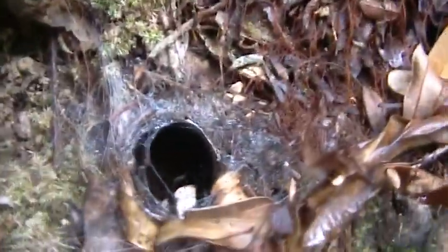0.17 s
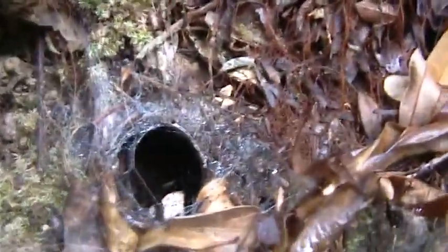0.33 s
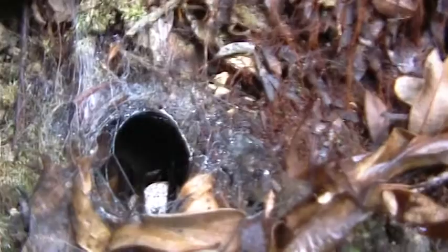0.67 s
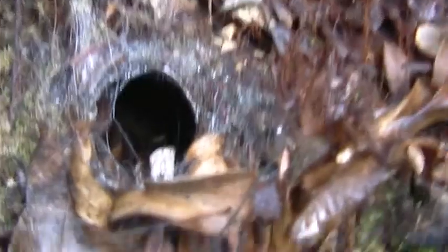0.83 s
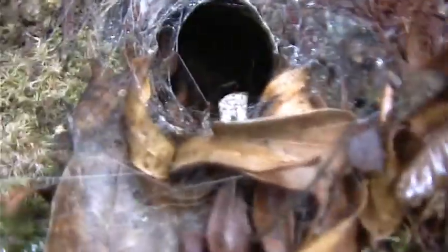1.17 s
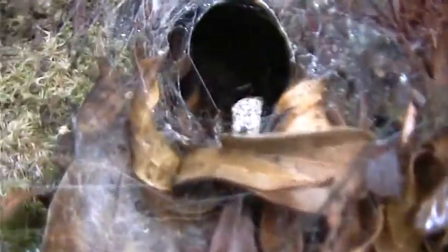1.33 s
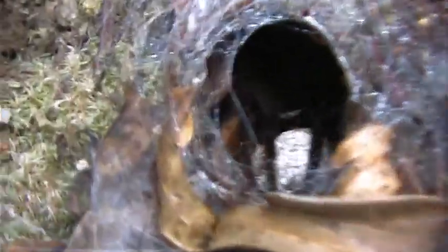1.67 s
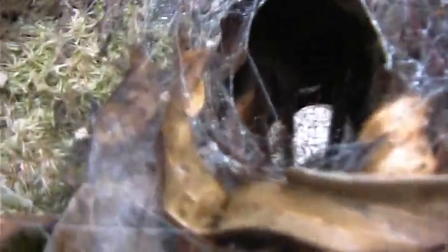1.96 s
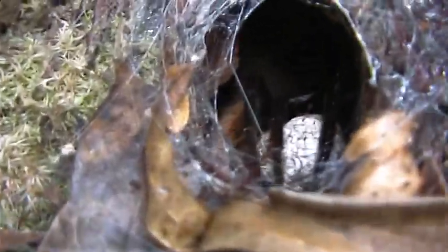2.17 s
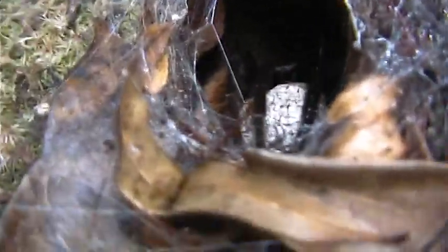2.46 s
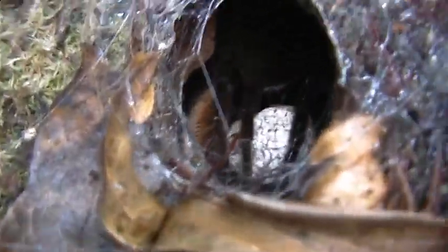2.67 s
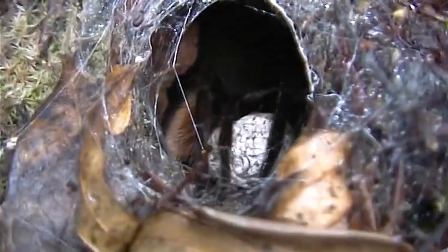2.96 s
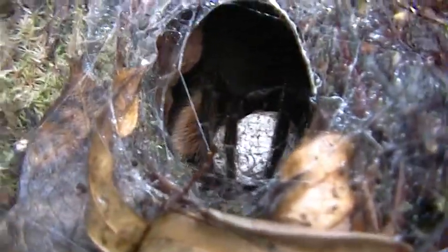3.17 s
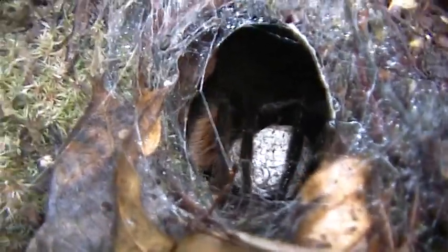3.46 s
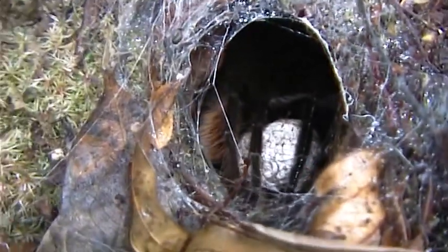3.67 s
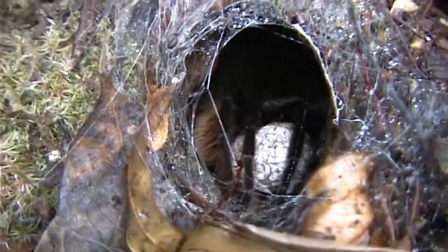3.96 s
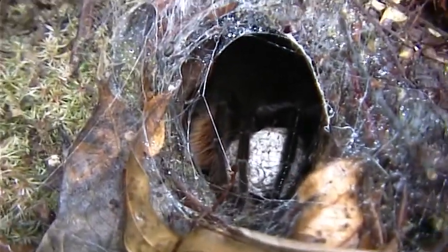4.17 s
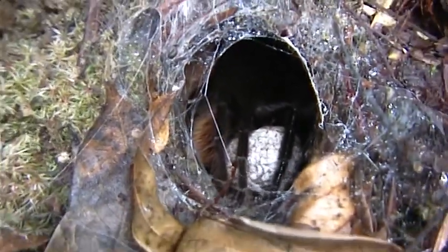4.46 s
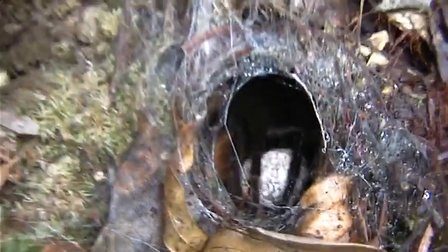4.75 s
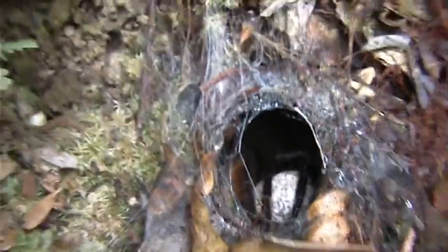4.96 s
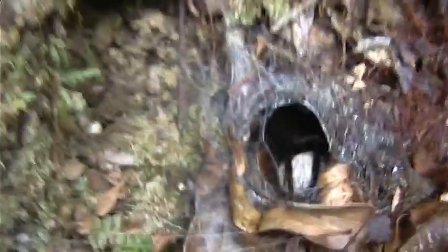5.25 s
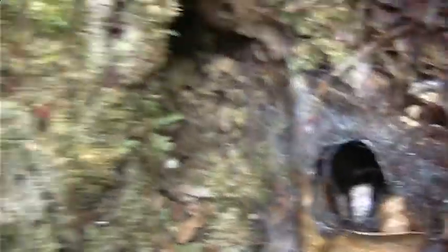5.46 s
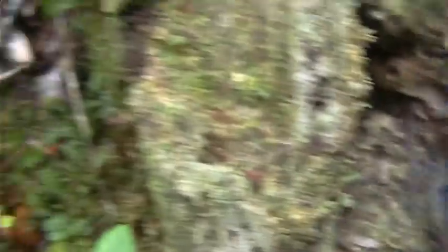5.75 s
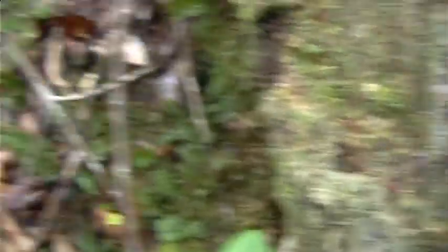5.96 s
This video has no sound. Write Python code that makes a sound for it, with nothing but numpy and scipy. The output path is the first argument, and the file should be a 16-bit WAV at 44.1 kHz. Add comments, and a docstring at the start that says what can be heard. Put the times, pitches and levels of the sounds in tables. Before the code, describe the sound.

Close handling noise against a quiet, wide woodland background: sharp hollow plastic clicks with small dull thuds at first, then a calm middle with insect hiss and distant, echoing bird whistles. Near the end the camera swings away, with crackly leaf and finger rustle and another flurry of brittle taps, before a quick run of hard blows overloads the built-in stereo microphone.

```python
"""Rainforest floor, around a hand-held camera: shaped noise makes a steady insect hiss, sines a faint motor whine.
Noise bursts through the ringing plastic case make finger taps, and low thuds come from the hand's weight.
Sliding sine notes with scattered echoes are birds far off among the trees. Sparse crackles make a faint rustle
of dry leaves, which swells as the camera swings away. At the end a hard knock overloads the microphone."""
import sys
import numpy as np
from scipy import signal
from scipy.fft import rfft, irfft
from scipy.io import wavfile

SR = 44100
rng = np.random.default_rng(int(sys.argv[2]) if len(sys.argv) > 2 else 0)


def inscribe(sig):
    """Save sig as 16-bit PCM at rate SR to the path in sys.argv[1].

    A 1-D sig is mono; a 2-D sig holds one channel per row.
    Samples are clipped to [-1, 1] before scaling.
    """
    pcm = np.round(np.clip(np.atleast_2d(sig).T, -1, 1) * 32767)
    wavfile.write(sys.argv[1], SR, pcm.astype(np.int16))


N = 268877
TIME, BINS = np.arange(N) / SR, np.fft.rfftfreq(N, 1 / SR)

# Relative colour of the plastic case: freq_hz [Hz], gain_db [dB]
CASE_COLOUR = [(60, -33.5), (270, -4), (650, 0.5), (1080, 6.5), (1750, 3), (2030, 9), (2450, 2), (2950, 2),
               (3600, -2), (4500, 0.5), (4950, -3.5), (5800, -5.5), (6700, -10.5), (9400, -15),
               (11500, -33), (15500, -41)]
# Stereo width of the microphone pair: freq_hz [Hz], side_over_mid_db [dB]
STEREO_WIDTH = [(110, -0.5), (200, -5.5), (380, -2), (700, -5.5), (1290, -6), (2380, -8), (4400, -6),
                (7500, 5.5), (15000, -0.5)]


def amp(db):
    """Decibels to gain."""
    return 10 ** (np.asarray(db) / 20)


def unit(x):
    """Scales to rms 1."""
    return x / np.sqrt(np.mean(x ** 2) + 1e-20)


def read(points, hz):
    """Reads a spectrum table on a log-frequency axis."""
    freq_hz, value = np.transpose(points)
    return np.interp(np.log(hz + 1), np.log(freq_hz + 1), value)


def add(mix, start_s, sound):
    """Adds a sound to the mix from start_s on, cut off at the end of the mix."""
    part = mix[:, max(round(start_s * SR), 0):][:, :sound.shape[1]]
    part += sound[:, :part.shape[1]]


def drift(rate_hz, size=N):
    """Random motion of rms 1: noise whose spectrum falls off smoothly around rate_hz."""
    spectrum = rfft(rng.standard_normal(size))
    rolloff = np.exp(-(np.fft.rfftfreq(size, 1 / SR) / rate_hz) ** 2)
    return unit(irfft(spectrum * rolloff, size))


def lowpass(x, corner_hz):
    """Dulls a sound above corner_hz with a second-order low-pass."""
    return signal.sosfilt(signal.butter(2, corner_hz, fs=SR, output="sos"), x)


def causal(db):
    """Impulse response with this spectrum and all its ringing after the onset (minimum phase)."""
    mirrored_db = np.r_[db, db[-2:0:-1]]
    log_gain = np.log(amp(mirrored_db))
    return np.fft.ifft(np.exp(np.conj(signal.hilbert(log_gain)))).real


def spread(pair, colour, top_hz=13600):
    """Colours two signals as mid and side below top_hz; returns left and right, with the mid at rms 1."""
    gain = amp(read(colour, BINS)) / (1 + (BINS / top_hz) ** 80)
    mid_side_gain = [np.ones(len(BINS)), amp(read(STEREO_WIDTH, BINS))]
    mid, side = irfft(rfft(pair) * gain * mid_side_gain, N)
    return np.array([mid + side, mid - side]) / np.std(mid)


def insects(level_db=-54, swell_db=0.42, flutter_db=1.02):
    """Countless far insects merge into a gently fluctuating noise hiss over the low murmur of the forest."""
    # Relative colour of hiss and murmur: freq_hz [Hz], density_db [dB per Hz]
    forest_colour = [(25, 0), (70, 2.5), (115, -1.5), (230, 2.5), (420, -5), (700, -2.5), (1150, -5.5),
                     (2000, -3.5), (3400, -2.5), (4200, -3.5), (5000, -6), (5900, -7), (7000, -11.5),
                     (8800, -19), (13000, -20.5)]
    fluctuation_db = swell_db * drift(11.0) + flutter_db * drift(21.3)
    chorus = rng.standard_normal((2, N)) * amp(fluctuation_db)
    return amp(level_db) * spread(chorus, forest_colour)


def motor(waver=0.00023, side=0.075):
    """Thin sine lines of the camera's motor, wavering together with its speed (waver as a share of pitch)."""
    # Lines of the motor: pitch_hz [Hz], level_db [dB rms]
    motor_lines = [(150.5, -73), (1900, -72.5), (4199.5, -67.5), (4500, -72.5), (5700, -74.5)]
    clock = np.cumsum(1 + waver * drift(8.3)) / SR
    mid_side = np.zeros((2, N))
    for pitch_hz, level_db in motor_lines:
        start_turns = rng.random((2, 1))
        mid_side += amp(level_db) * np.sqrt(2) * np.sin(2 * np.pi * (pitch_hz * clock + start_turns))
    mid, wide = mid_side
    return np.array([mid + side * wide, mid - side * wide])


def rustle(grains_per_s=2500, clump_db=1.0, dull_hz=2600, finger_share=0.21):
    """Tiny crackles in clumps follow the movement: dull under a sliding finger, crisp in the leaves."""
    # Finger slides on the case: middle_s [s], half_length_s [s], level_db [dB]
    finger_slides = [(0.578, 0.018, -45), (1.29, 0.81, -71.5)]
    # Level path of leaves and finger in the swing, held before and after: time_s [s], level_db [dB]
    swing_path = [(4.2, -60), (4.6, -55.5), (5.2, -52), (5.65, -51.5), (5.8, -47), (6.1, -60.5)]
    # Relative colour of the dry leaves: freq_hz [Hz], density_db [dB per Hz]
    leaf_colour = [(40, 9.5), (300, 1.5), (1000, -4), (2200, 6), (3300, 6), (6000, 3), (9000, -13.5),
                   (14000, -24)]
    clumps = amp(clump_db * drift(21.0))
    grains = rng.standard_normal((2, N)) * (rng.random(N) < grains_per_s / SR) * clumps
    finger = spread(lowpass(grains, dull_hz), CASE_COLOUR)
    leaves = spread(grains, leaf_colour)
    slide_level = np.zeros(N)
    for middle_s, half_length_s, level_db in finger_slides:
        slide_level += amp(level_db) * np.exp(-((TIME - middle_s) / half_length_s) ** 2)
    swing_level = amp(np.interp(TIME, *np.transpose(swing_path)))
    # finger_share splits the power of the swing
    swing = np.sqrt(finger_share) * finger + np.sqrt(1 - finger_share) * leaves
    return slide_level * finger + swing_level * swing


def strikes(rows, click_db, snap, spot_db, tail_db, tail_t60, side, pan_db, ring_db,
            rise_s=.0004, spot_octaves=0.13, pan_hz=340):
    """A contact snaps and chatters briefly; the touched spot and the whole case colour it and ring on."""
    # Ringing modes of the case: pitch_hz [Hz], relative level_db [dB], t60_s [s]
    ringing_modes = [(310, -22.5, 0.035), (413, -23.5, 0.016), (596, -23.5, 0.063), (998, -24.5, 0.1),
                     (1294, -19, 0.026), (2087, -23, 0.13), (2590, -26, 0.025), (4340, -15, 0.022)]
    out = np.zeros((2, N))
    t, hz = np.arange(8192) / SR, np.fft.rfftfreq(2048, 1 / SR)
    bass, treble = 1 / (1 + (hz / 700) ** 2), 1 - 1 / (1 + (hz / 5000) ** 4)
    for start_s, level_db, spot_hz, bass_db, treble_db, t60_s in rows:
        decay = amp(-60 * t / t60_s) + amp(tail_db - 60 * t / tail_t60)
        chatter = rng.standard_normal((2, len(t))) * (1 - np.exp(-t / rise_s)) * decay
        chatter /= np.linalg.norm(chatter, axis=1, keepdims=True)
        # the snap is a single impulse in the mid
        chatter[0, round(rise_s * SR)] += snap

        # a soft fingertip gives bass, a nail gives treble
        touch = bass * bass_db + treble * treble_db
        octaves_off = np.log2((hz + 1) / spot_hz)
        spot = spot_db / (1 + (octaves_off / spot_octaves) ** 2)
        colour = read(CASE_COLOUR, hz) + spot + touch
        body = [causal(colour), side * causal(colour + read(STEREO_WIDTH, hz))]
        mid, wide = signal.fftconvolve(chatter, body, axes=1)[:, :len(t)]
        click = amp(click_db) * np.array([mid + wide, mid - wide]) / np.linalg.norm(mid)

        ring = np.zeros(len(t))
        for k, (pitch_hz, mode_db, mode_t60_s) in enumerate(ringing_modes):
            mode_level = amp(mode_db + np.interp(pitch_hz, hz, touch) - 60 * t / mode_t60_s)
            # neighbouring modes start in opposite directions
            ring += (-1) ** k * mode_level * np.sin(2 * np.pi * pitch_hz * t)
        add(out, start_s, (click + amp(ring_db) * ring) * amp(level_db))
    # around pan_hz the case speaks louder into the left port
    lean = pan_db / (1 + np.log2((hz + 1) / pan_hz) ** 2)
    return signal.oaconvolve(out, [causal(lean / 2), causal(-lean / 2)], axes=1)[:, :N]


def finger_taps():
    """Fingers click on the case: soft or hard contacts, each colouring the chatter by the spot touched."""
    # Taps: start_s [s], level_db [dB, ahead of the click and ring gains], spot_hz [Hz],
    # bass_db [dB, weight], treble_db [dB, hardness], chatter_t60_s [s]
    tap_rows = [(.226, -16.5, 2130, -35, -35, 0.012), (.236, -24.5, 1520, -3, -5, 0.058),
                (.375, -23, 1250, -5, 1, 0.017), (.414, -22, 1210, 5, 5, 0.02),
                (.4165, -13, 2070, -2.5, -23, 0.025), (.431, -26, 300, 26, -20, 0.05),
                (.443, -27, 2020, 12, -25, 0.026), (.457, -22.5, 1880, 1, -22, 0.11),
                (.717, -36.5, 475, 17, -30, .02), (.863, -27.5, 1500, -4, -24.5, 0.056),
                (.883, -24, 1150, 20, -12, 0.019), (.888, -15, 4550, 1, -2.5, 0.011),
                (.8895, -15.5, 2900, 4, -4, 0.034), (.993, -17.5, 1860, 8, -11, .02),
                (1.721, -30, 790, 9, 0, 0.026), (2.083, -35, 2920, 12, 13, 0.013),
                (2.3145, -33, 3540, -52, -7.5, 0.0064), (4.344, -24, 1060, -4, -48, 0.0186),
                (5.011, -23.5, 1200, -4, -1.5, 0.0158), (5.071, -28, 3140, -7, -10, 0.0056),
                (5.187, -10, 2800, -30, 12.5, 0.0095), (5.378, -23.5, 1820, 4, 4, 0.048),
                (5.392, -18.5, 2440, 8, 0, 0.019), (5.3945, -13, 2500, 9.5, -22, 0.013),
                (5.429, -23, 2330, -5, 8, 0.019), (5.433, -26, 256, 24, 6, 0.028),
                (5.485, -23.5, 1260, 9, -9, 0.02), (5.499, -22, 3970, -43, -24, 0.035),
                (5.578, -18, 1950, -39, 0.5, 0.0232), (5.605, -12.5, 985, 8.5, 2.5, 0.02),
                (5.955, -24.5, 2440, 9, -39, 0.01)]
    return strikes(tap_rows, click_db=11.5, snap=0.62, spot_db=10.5, tail_db=-35, tail_t60=.13,
                   side=1.67, pan_db=4.5, ring_db=-8.5)


def bumps(corner_hz=170, push_s=0.0021, push=1.24):
    """The hand's weight pushes the microphone once, then shakes it in a short dull thud."""
    # Soft pushes: start_s [s], level_db [dB], t60_s [s], side_over_mid_db [dB]
    hand_pushes = [(0.4137, -27, 0.046, -3), (.431, -39.5, 0.23, 3), (0.883, -46.5, 0.22, 4.5),
                   (1.739, -53.5, 0.31, 4), (4.48, -55, 0.4, -1.5), (5.43, -39, 0.14, 7.5),
                   (6.018, -38, 0.066, 22.5), (6.05, -50, 0.195, -1)]
    out, t = np.zeros((2, N)), np.arange(SR // 2) / SR
    # a push one way that swings back past rest
    shove = lowpass((1 - t / push_s) * np.exp(-t / push_s), 2 * corner_hz)
    shove /= shove.max()
    for start_s, level_db, t60_s, side_db in hand_pushes:
        rumble = unit(lowpass(rng.standard_normal((2, len(t))), corner_hz))
        thud = push * shove + rumble * amp(-60 * t / t60_s)
        mid, wide = thud * amp(level_db) * amp([[0], [side_db]])
        add(out, start_s, np.array([mid + wide, mid - wide]))
    return out


def note(glide_hz, trill_depth, level_db, trill_hz=84.3, waver_share=0.0055, edge_s=.02):
    """A sine along a pitch path with quick attack and release; trill and waver are shares of the pitch."""
    t = np.arange(len(glide_hz)) / SR
    trill = np.sin(2 * np.pi * trill_hz * t + 0.36 * drift(31.0, size=len(t)))
    waver = waver_share * drift(48, size=len(t))
    turns = np.cumsum(glide_hz * (1 + trill_depth * trill + waver)) / SR
    envelope = np.minimum(np.minimum(t, t[-1] - t) / edge_s, 1)
    return amp(level_db) * unit(np.sin(2 * np.pi * turns) * envelope)[None]


def trees(call, wet, t60, direct=.8, side=0.56, build_s=0.0065, echoes_per_s=2000):
    """Trunks scatter a call into many echoes that build up behind it and die away."""
    t = np.arange(SR) / SR
    sparse = rng.standard_normal((2, SR)) * (rng.random((2, SR)) < echoes_per_s / SR)
    echoes = sparse * amp(-60 * t / t60) * (1 - np.exp(-t / build_s))
    echoes *= wet / np.linalg.norm(echoes[0])
    mid, wide = signal.fftconvolve(call[None], echoes, axes=1)[:, :N]
    return direct * call + mid + side * np.array([wide, -wide])


def birds(buzz_depth=0.111, arch_depth=0.14):
    """Birds among the trees: sliding whistles, and farther off, trilled buzzes and an arched call."""
    # Whistles, sliding toward a second pitch: start_s [s], length_s [s], from_hz [Hz], to_hz [Hz],
    # slide_s [s], level_db [dB rms, ahead of the trees]
    whistle_rows = [(2.168, 0.0247, 3210, 3160, 0.0203, -52), (3.18, 0.06, 2284, 2490, 0.063, -55.5),
                    (3.218, 0.04, 2560, 2440, 0.032, -59), (3.345, 0.165, 1965, 1488, 0.058, -59),
                    (3.625, 0.11, 2447, 2424, 0.0484, -53), (3.84, 0.11, 1478, 1602, 0.19, -59.5),
                    (4.312, 0.065, 2380, 2120, 0.052, -51), (4.355, 0.075, 2043, 1942, 0.078, -44),
                    (4.799, 0.1, 2950, 2802, 0.145, -49.5), (4.936, 0.16, 1890, 1710, 0.053, -53),
                    (5.075, 0.09, 4500, 4390, 0.06, -58), (5.099, 0.21, 1654, 1523, 0.168, -58)]
    # Buzzes, the same slide with a fast trill: the same columns and units
    buzz_rows = [(1.94, 0.14, 5340, 5390, 0.16, -56), (2.1, 0.09, 5900, 5530, 0.066, -55),
                 (2.128, 0.132, 4640, 3800, 0.07, -53), (3.152, 0.11, 4470, 4006, .11, -58),
                 (3.788, 0.055, 2285, 1735, 0.051, -55.5), (5.045, 0.081, 4390, 4140, 0.077, -54)]
    # Repeats of the arched call: start_s [s], length_s [s], level_db [dB rms, ahead of the trees]
    arch_rows = [(2.973, .195, -56), (4.868, .195, -54)]
    near, far = np.zeros((2, 1, N))
    for song, rows, depth in (near, whistle_rows, 0), (far, buzz_rows, buzz_depth):
        for start_s, length_s, from_hz, to_hz, slide_s, level_db in rows:
            way = np.minimum(np.arange(0, length_s, 1 / SR) / slide_s, 1)
            glide_hz = from_hz + (to_hz - from_hz) * np.sin(np.pi / 2 * way)
            add(song, start_s, note(glide_hz, depth, level_db))
    foot_hz, top_hz, rise_s, fall_s = 4038, 4906, 0.066, 0.056
    for start_s, length_s, level_db in arch_rows:
        t = np.arange(0, length_s, 1 / SR)
        # the line climbs, holds and sinks
        height = np.minimum(t / rise_s, (length_s - t) / fall_s).clip(0, 1)
        line_hz = foot_hz + (top_hz - foot_hz) * height
        # the trill deepens and hangs below the line
        depth = arch_depth * t / length_s
        add(far, start_s, note(line_hz / (1 + depth), depth, level_db))
    return trees(near[0], wet=0.47, t60=.4) + trees(far[0], wet=0.94, t60=0.75)


def hard_knock():
    """A quick run of heavy blows on the case, each snapping, chattering and ringing like a louder tap."""
    # Blows: start_s [s], level_db [dB, ahead of the click and ring gains], spot_hz [Hz],
    # bass_db [dB], treble_db [dB], chatter_t60_s [s]
    blow_rows = [(6.0134, -11.5, 1980, 15, 1, 0.0042), (6.0158, -5, 4250, 4.5, -4, 0.007),
                 (6.0172, -7, 1290, 7.5, -10, 0.009), (6.0214, -4.5, 2600, 2.5, -0.5, 0.0083),
                 (6.030, -16.5, 560, 10, -7, 0.0213)]
    return strikes(blow_rows, click_db=17.5, snap=0.76, spot_db=8.5, tail_db=-30, tail_t60=.07,
                   side=1.47, pan_db=11.5, ring_db=-5, rise_s=.0007)


def scene():
    """The forest, and the handling close to the microphone."""
    forest = insects() + birds()
    handling = motor() + rustle() + finger_taps() + bumps() + hard_knock()
    return forest + handling


def record(dry, notch_hz=5080, notch_width_hz=230, notch_db=-8, edge_hz=16200):
    """The microphone port cuts a narrow notch; the loudest peaks clip; then the band limit."""
    hz = np.fft.rfftfreq(2048, 1 / SR)
    port = causal(notch_db * np.exp(-((hz - notch_hz) / notch_width_hz) ** 2))
    clipped = np.clip(signal.oaconvolve(dry, port[None], axes=1)[:, :N], -1, 1)
    band_limit = signal.firwin(511, edge_hz, window=("kaiser", 9), fs=SR)
    return signal.oaconvolve(clipped, band_limit[None], "same")


dry = scene()
out = record(dry)
inscribe(out)
```